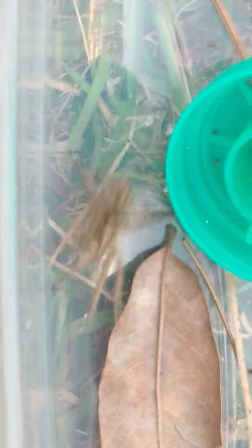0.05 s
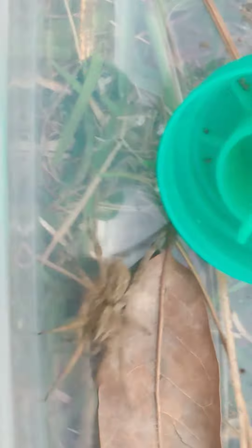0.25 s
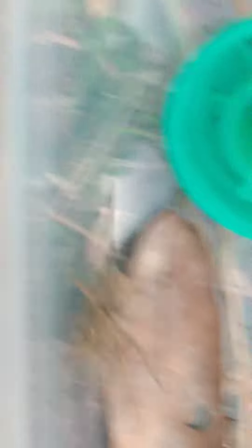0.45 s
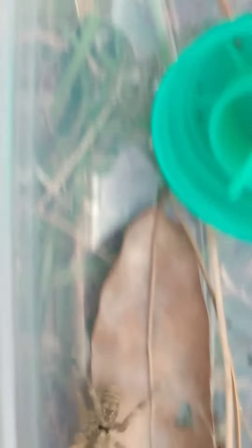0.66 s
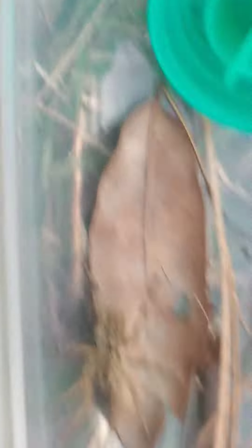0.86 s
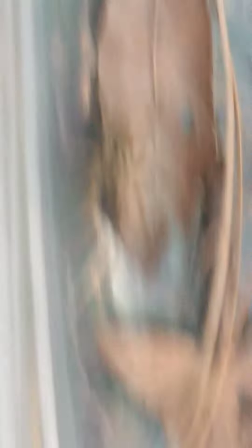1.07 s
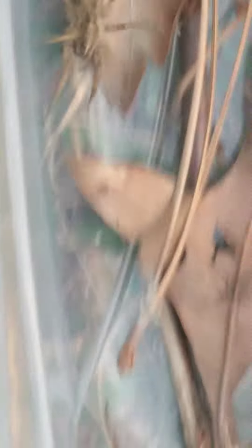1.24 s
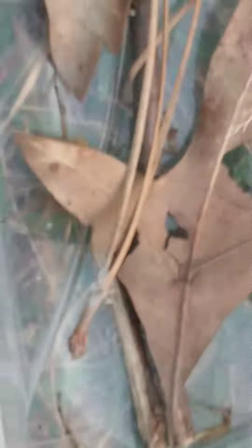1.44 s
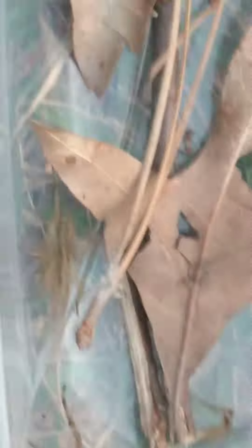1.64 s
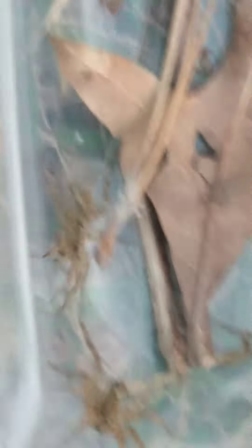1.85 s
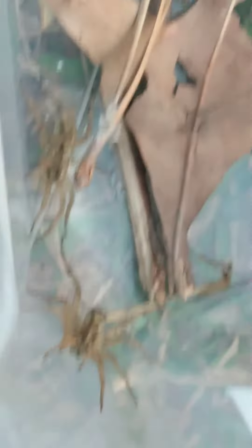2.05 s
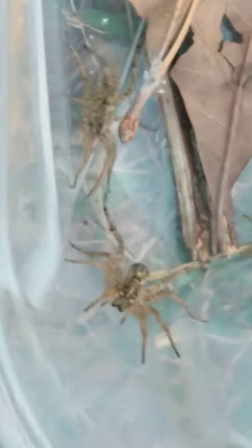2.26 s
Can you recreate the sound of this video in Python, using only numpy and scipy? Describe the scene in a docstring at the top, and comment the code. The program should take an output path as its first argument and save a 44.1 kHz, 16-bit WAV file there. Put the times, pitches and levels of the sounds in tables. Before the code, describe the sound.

Spiders scurry over dry leaves and pine needles in a plastic tub, making three faint, high rustles with tiny ticks, the last the loudest. Low rumble and soft bumps from the handheld phone run underneath.

```python
"""Spiders on dry leaves and pine needles in a plastic tub, followed by a hand-held phone.
From the start the hand rumbles and bumps on the case; needles ping over faint, wavering mid tones.
At 0.5 s the first scurry: tiny leg slips ring high leaf resonances, with a sharp tick.
Near 1 s a leg taps the tub; a second scurry adds a thin scrape, soft high flecks and more ticks.
The third, loudest scurry starts at 1.65 s and dies by 2.2 s; a few pings follow."""
import sys
import numpy as np
from scipy import signal
from scipy.fft import rfft, irfft
from scipy.io import wavfile
from scipy.ndimage import uniform_filter1d

SR = 44100
rng = np.random.default_rng(int(sys.argv[2]) if len(sys.argv) > 2 else 0)


def dump(signal):
    """Clip the signal to [-1, 1] and save it as 16-bit WAV at the path in sys.argv[1]."""
    limited = np.clip(np.atleast_2d(signal).T, -1, 1)
    pcm = np.round(limited * 32767).astype(np.int16)
    wavfile.write(sys.argv[1], SR, pcm)


N = 105840

# rustle, one table per scurry (time [s], level near 9, 11, 12.5 and 14 kHz [dB])
SCURRY_LEVELS = [
    [(0.514, -104, -109, -103, -101), (0.526, -81, -59.5, -70, -65), (0.624, -89, -73.5, -68, -68),
     (0.692, -71.5, -64.5, -63, -66), (0.744, -72, -65.5, -60.5, -69), (0.806, -89.5, -90, -75, -78),
     (0.828, -66.5, -68, -78, -73), (0.86, -65.5, -84.5, -86, -70), (0.918, -83, -96, -100, -104),
     (0.935, -70, -76, -93, -92)],
    [(0.99, -66, -79, -70, -92), (1.02, -58, -70, -69, -73), (1.082, -56.5, -56.5, -62, -59.5),
     (1.156, -66, -65.5, -71, -65), (1.186, -59.5, -64, -60, -63), (1.204, -71, -89, -73, -77),
     (1.3, -85, -86, -91, -87), (1.43, -83, -80, -71, -88), (1.444, -86, -57.5, -72, -71),
     (1.468, -78, -75, -71, -83), (1.62, -74, -73, -70, -81)],
    [(1.65, -64.5, -58, -57, -57), (1.678, -57.5, -57, -49, -54), (1.74, -67, -61.5, -62, -62.5),
     (1.884, -65, -86, -64.5, -79), (1.99, -82.5, -89, -68.5, -98), (2.094, -100, -90, -74, -100),
     (2.14, -79.5, -104, -81, -75), (2.2, -83, -105, -105, -110)],
]
# leaf resonances, one per level column (centre [Hz], width [Hz], gain [dB], drift [Hz/s])
LEAF_MODES = [(9130, 1400, -2, -7), (11430, 2400, -1.5, -700), (12420, 1100, -3.5, -350),
              (14400, 1500, -3.5, 4.5)]
# leaf resonances under hard scraping (centre [Hz], width [Hz], gain [dB])
HARD_MODES = [(7960, 1100, -0.5), (10500, 810, -21), (15800, 620, -23.5)]
# leg dragged along a leaf (time [s], pitch [Hz], level [dB])
SCRAPE_PATH = [(0.998, 11580, -77), (1.201, 11320, -75), (1.28, 11280, -68.5), (1.449, 11090, -64),
               (1.66, 11060, -66.5), (1.9, 10750, -76)]
# leg ticks, snapping fibres (time [s], peak [dB], centre [Hz], width [Hz], decay [s])
LEG_TICKS = [(0.5235, -61, 12200, 4500, 0.011), (1.176, -50.5, 9300, 1800, 0.0076),
             (1.4415, -55, 12850, 4020, .005), (1.8778, -44.5, 9050, 1590, 0.0018)]
# leg taps on the tub (time [s], level [dB], treble edge [Hz], decay [s])
WALL_TAPS = [(0.9747, -52, 14100, 0.00092), (1.6881, -58.5, 4800, 0.0056)]
# tub wall modes (centre [Hz], width [Hz], gain [dB])
WALL_MODES = [(2440, 330, -8.5), (3850, 790, -2), (4500, 700, -3.5), (6060, 1500, 1), (8400, 1500, 5.5),
              (12000, 1400, 3.5)]
# needle and leaf rings (time [s], level [dB], pitch [Hz], width [Hz], decay [s])
NEEDLE_PINGS = [(0.0, -85, 4270, 162, 0.052), (0.02, -87.5, 3140, 397, 0.099),
                (0.314, -80.5, 2950, 110, 0.016), (0.32, -81, 4250, 130, 0.055),
                (0.384, -74.5, 4190, 122, 0.077), (0.52, -80, 5930, 150, 0.028),
                (0.973, -74.5, 3850, 347, 0.043), (0.972, -82, 2500, 215, 0.042),
                (0.982, -70.5, 6000, 455, 0.093), (1.04, -76, 2056, 103, 0.03),
                (1.07, -66, 7180, 364, 0.042), (1.16, -69, 2122, 122, 0.057), (1.207, -77, 3140, 90, .031),
                (1.328, -75.5, 1664, 90, 0.035), (1.438, -76, 1950, 79, 0.025),
                (1.684, -76, 4420, 248, 0.033), (2.101, -72.5, 3835, 229, 0.038),
                (2.115, -81.5, 6060, 116, 0.031), (2.12, -74, 4450, 120, 0.022),
                (2.125, -71, 1530, 273, 0.028), (2.256, -76.5, 7970, 242, 0.085),
                (2.349, -71, 3950, 660, 0.12), (2.36, -76, 2925, 87, 0.1), (2.335, -70, 9900, 704, 0.12)]
# hand rumble envelope (time [s], level [dB])
RUMBLE_LEVELS = [(0, -67.5), (0.06, -54.5), (0.2, -53), (0.25, -41), (0.33, -52), (0.45, -42.5),
                 (0.56, -39.5), (0.65, -50.5), (0.8, -35), (0.92, -45), (1.0, -37.5), (1.11, -38.5),
                 (1.22, -44), (1.42, -46), (1.5, -39), (1.62, -36.5), (1.7, -45.5), (1.82, -44.5),
                 (1.89, -34.5), (2.0, -44), (2.15, -45.5), (2.3, -56), (2.4, -56)]
# hand rumble spectrum (frequency [Hz], relative density [dB])
RUMBLE_SPECTRUM = [(20, -12), (35, -9.5), (55, 3), (85, 2), (125, 1.5), (170, -11), (220, -26.5),
                   (320, -31.5), (450, -50), (800, -75.5)]
# finger bumps, higher if harder (time [s], peak [dB], pitch [Hz])
FINGER_BUMPS = [(0.2438, -26.5, 67.7), (0.433, -32.5, 87.5), (0.509, -30, 135), (0.5288, -22, 133.5),
                (0.685, -28.5, 87.2), (0.725, -30.5, 96.8), (0.7947, -22, 113.3), (0.803, -22, 99.5),
                (0.819, -21.5, 149.3), (0.886, -32, 105), (0.972, -34.5, 151.2), (1.111, -30, 156),
                (1.132, -30.5, 99), (1.176, -26.5, 125), (1.32, -25.5, 137), (1.5404, -30, 130),
                (1.606, -32.5, 160), (1.6294, -19.5, 132), (1.745, -31, 89), (1.868, -33.5, 96),
                (2.006, -23, 121), (2.119, -35, 98.6), (2.357, -44, 79)]
# skin rub spectrum (frequency [Hz], relative density [dB])
RUB_SPECTRUM = [(200, 2.5), (420, -11.5), (900, -51.5)]
# knocks on the case (time [s], level [dB])
CASE_KNOCKS = [(0.522, -38.5), (0.815, -46), (0.967, -46.5), (1.109, -54), (1.31, -48), (1.6282, -37.5),
               (2.003, -47.5)]
# phone case modes (frequency [Hz], decay [s], gain [dB])
PHONE_MODES = [(296, 0.018, -8), (341, 0.013, -7), (461.4, 0.013, -21)]
# wavering mid tones (middle [s], length [s], pitch [Hz], glide [Hz/s], level [dB])
TONE_SWELLS = [(0.045, 0.089, 1358, -200, -69), (0.179, .12, 810, 596, -78.5),
               (0.246, 0.072, 997, 0, -72.5), (0.365, 0.13, 947, 1101, -71),
               (0.448, 0.096, 1366, -700, -70.5), (0.594, 0.06, 1315, 699.5, -73),
               (0.774, 0.42, 1017, 1, -76), (1.01, 0.097, 1334, -500, -71.5),
               (1.101, 0.045, 1040, 7, -70.5), (1.118, 0.079, 1354, 8.5, -66.5),
               (1.23, 0.11, 1360, -1, -72.5), (1.388, 0.14, 737, 300.5, -71.5),
               (1.498, 0.13, 1301, -700, -73), (1.65, 0.13, 730, -500, -68),
               (1.681, 0.11, 1142, -400, -72.5), (1.78, 0.13, 1242, -0.5, -72), (2.007, 0.056, 720, 3, -71),
               (2.062, 0.14, 1124, 999, -68.5), (2.176, 0.24, 1265, -300, -69.5),
               (2.244, 0.089, 1147, -700, -70), (2.38, 0.094, 1180, 499.5, -74),
               (2.384, 0.041, 670, -3, -73)]
# background air spectrum (frequency [Hz], relative density [dB])
AIR_SPECTRUM = [(180, -33), (300, -4), (580, -2), (760, 2.5), (1050, -.5), (1350, 0.5), (1600, -8),
                (2800, -17.5), (12500, -18.5), (15500, -19.5)]
# air bands (edge [Hz])
AIR_EDGES_HZ = (0, 550, 800, 1000, 1200, 1500, 24000)

SLIPS_PER_S, SLIP_SCATTER_DB = 9000, 2
RIPPLE_DB, RIPPLE_STEP_HZ, RIPPLE_CHANGE_S = 5.0, 210, 0.11
DRIFT_ZERO_S = 1.6
HARD_DB, HARD_POWER = -50.5, 2.12  # level that counts as hard; growth exponent
RUSTLE_FLUTTER_DB, RUSTLE_FLUTTER_PER_S = 1.8, 50
FLECK_SPAN_S, FLECK_RANGE_HZ, FLECKS_PER_S = (1.0, 1.95), (6400, 15000), 130
FLECK_MIN_DB, FLECK_SCATTER_DB, FLECK_SIGMA_S = -84, 2.5, 0.013
RUB_DB = -18  # relative to the bump envelope
AIR_DB, AIR_FLUTTER_DB, AIR_FLUTTER_PER_S = -76, 2.6, 20


def rustle():
    """Slips ring leaf resonances that drift as the spiders move; hard scraping widens the sound."""
    t, rows = clock(), np.vstack(SCURRY_LEVELS)
    levels = [undb(np.interp(t, rows[:, 0], db, left=-110, right=-110)) for db in rows[:, 1:].T]
    out = np.zeros(N)
    for level, (hz, width, db, drift) in zip(levels, LEAF_MODES):
        ring = resonate(leg_slips(), hz, width, drift * (t - DRIFT_ZERO_S))
        out += level * undb(db) * steadied(ring, span_s=0.044)
    hard = sum(undb(db) * resonate(leg_slips(), hz, width) for hz, width, db in HARD_MODES)
    out += undb(HARD_DB) * (levels[0] / undb(HARD_DB)) ** HARD_POWER * hard
    return out * undb(RUSTLE_FLUTTER_DB * wander(RUSTLE_FLUTTER_PER_S))


def leg_slips():
    """Dense, uneven slips with a fine, shifting random ripple in their colour."""
    slips = (rng.random(N) < SLIPS_PER_S / SR) * rng.standard_normal(N)
    spectrum = rfft(slips * undb(SLIP_SCATTER_DB * rng.standard_normal(N)))
    knots, f = np.arange(0, SR / 2, RIPPLE_STEP_HZ), np.fft.rfftfreq(N, 1 / SR)
    ripples = [np.interp(f, knots, rng.standard_normal(len(knots))) for _ in range(4)]
    colours = np.stack([irfft(spectrum * undb(RIPPLE_DB * ripple), N) for ripple in ripples])
    progress = clock() / RIPPLE_CHANGE_S + rng.random()
    step, blend, i = progress.astype(int), progress % 1, np.arange(N)
    return (1 - blend) * colours[step % len(colours), i] + blend * colours[(step + 1) % len(colours), i]


def scrape():
    """A leg drags along a leaf: slips ring one narrow, slowly sinking resonance."""
    t = clock()
    when, hz, db = np.array(SCRAPE_PATH).T
    ring = resonate(leg_slips(), hz.mean(), width_hz=800, shift_hz=np.interp(t, when, hz) - hz.mean())
    return steadied(ring, span_s=0.04) * undb(np.interp(t, when, db, left=-120, right=-120))


def ticks():
    """Legs and snapping fibres crack for milliseconds, each in its own band."""
    return sum(undb(db) * crack(start, decay, hz, width) for start, db, hz, width, decay in LEG_TICKS)


def taps():
    """Light leg taps ring the tub wall; a softer tap barely stirs the high modes."""
    return sum(undb(db + gain) / (1 + (hz / edge) ** 6) * crack(when, decay, hz, width)
               for when, db, edge, decay in WALL_TAPS for hz, width, gain in WALL_MODES)


def pings():
    """Needles and leaves ring in faint, narrow bands that swell and fade."""
    t, out = clock(), np.zeros(N)
    for start, db, hz, width, decay in NEEDLE_PINGS:
        age, attack_s = t - start, 0.23 * decay
        envelope = np.clip(age / attack_s, 0, 1) * np.exp(-np.maximum(age - attack_s, 0) / decay)
        ring = steadied(resonate(rng.standard_normal(N), hz, width), span_s=0.043)
        out += undb(db) * ring * envelope
    return out


def hand_rumble():
    """The moving hand shakes the case: low noise in swells."""
    level_db = np.interp(clock(), *np.array(RUMBLE_LEVELS).T)
    return steadied(coloured(RUMBLE_SPECTRUM), span_s=0.097) * undb(level_db)


def finger_bumps():
    """Fingers push the case aside and it springs back; skin rubs during each bump."""
    t, bumps = clock(), np.zeros(N)
    for when, db, hz in FINGER_BUMPS:
        u = (np.pi * hz * (t - when)) ** 2
        bumps += undb(db) * (1 - 2 * u) * np.exp(-np.minimum(u, 60))  # case acceleration
    rub = uniform_filter1d(np.abs(bumps), size=SR // 200) * coloured(RUB_SPECTRUM)
    return bumps + undb(RUB_DB) * rub


def case_knocks():
    """Harder knocks ring the case modes; low-passed at 500 Hz."""
    t, ring = clock(), np.zeros(N)
    for when, db in CASE_KNOCKS:
        age = np.maximum(t - when, 0)
        for hz, decay, gain in PHONE_MODES:
            ring += undb(db + gain) * np.sin(2 * np.pi * hz * age) * np.exp(-age / decay)
    return signal.sosfiltfilt(signal.butter(4, 500, fs=SR, output="sos"), ring)


def flecks():
    """Brief, soft, high narrow-band flecks at random times and pitches."""
    age, out = clock()[:SR // 10], np.zeros(N)
    swell = np.exp(-0.5 * ((age - age.mean()) / FLECK_SIGMA_S) ** 2)
    for when, pitch, size in rng.random((int(FLECKS_PER_S * np.ptp(FLECK_SPAN_S)), 3)):
        start = int(np.interp(when, (0, 1), FLECK_SPAN_S) * SR)
        hz = np.interp(pitch, (0, 1), FLECK_RANGE_HZ)
        roughness = unit(np.convolve(rng.standard_normal(len(age)), np.hanning(SR // 200), "same"))
        db = FLECK_MIN_DB - FLECK_SCATTER_DB * np.log(1 - size)
        out[start:start + len(age)] += undb(db) * roughness * np.sin(2 * np.pi * hz * age) * swell
    return out


def wavering_tones():
    """Faint mid-pitched tones of narrow noise, in short, gliding, fluttering swells."""
    t, out = clock(), np.zeros(N)
    for middle, length, hz, glide, db in TONE_SWELLS:
        band = resonate(rng.standard_normal(N), hz, width_hz=110, shift_hz=glide * (t - middle))
        flutter_db = AIR_FLUTTER_DB / 2 * wander(AIR_FLUTTER_PER_S)
        swell = 1 / (1 + (2 * (t - middle) / length) ** 6)
        out += undb(db + flutter_db) * steadied(band, span_s=0.086) * swell
    return out


def air():
    """Faint broad noise whose middle bands flutter independently."""
    f = np.fft.rfftfreq(N, 1 / SR)
    spectrum = rfft(undb(AIR_DB) * coloured(AIR_SPECTRUM))
    low, *mids, high = [irfft(spectrum * (f >= lo) * (f < hi), N)
                        for lo, hi in zip(AIR_EDGES_HZ, AIR_EDGES_HZ[1:])]
    return low + high + sum(band * undb(AIR_FLUTTER_DB * wander(AIR_FLUTTER_PER_S)) for band in mids)


def crack(start_s, decay_s, hz, width_hz):
    """Dying burst of slips through one resonance; peak 1."""
    age = clock() - start_s
    burst = np.sign(rng.standard_normal(N)) * (age >= 0) * np.exp(-np.abs(age) / decay_s)
    ring = resonate(burst, hz, width_hz)
    return ring / np.abs(ring).max()


def resonate(x, hz, width_hz, shift_hz=0):
    """Steep-skirted resonance, moved by shift_hz; rms 1."""
    f = np.fft.fftfreq(N, 1 / SR)
    band = np.fft.ifft(np.fft.fft(x) * (f > 0) / (1 + np.abs((f - hz) / (0.51 * width_hz)) ** 4))
    cycles = np.cumsum(shift_hz + np.zeros(N)) / SR
    return unit(np.real(band * np.exp(2j * np.pi * cycles)))


def coloured(points):
    """Noise shaped by (frequency [Hz], level [dB]) points; rms 1."""
    hz, db = np.array(points, float).T
    f = np.fft.rfftfreq(N, 1 / SR)
    gain = undb(np.interp(np.log(f + 1), np.log(hz), db))
    return unit(irfft(rfft(rng.standard_normal(N)) * gain, N))


def steadied(x, span_s):
    """Even out the slow chance swells of a noise."""
    return x / np.sqrt(uniform_filter1d(x ** 2, max(int(span_s * SR), 3)) + 0.0067)


def wander(per_s):
    """Random curve, per_s knots a second; spread near 1."""
    knots = rng.standard_normal(1000)
    return np.sqrt(2) * np.interp(clock() * per_s, np.arange(len(knots)), knots)


def undb(db):
    """Decibels to gain."""
    return 10 ** (np.asarray(db) / 20)


def unit(x):
    """Scale to rms 1."""
    return x / np.sqrt(np.mean(x ** 2) + 1e-30)


def clock():
    """Sample times [s]."""
    return np.arange(N) / SR


def scene():
    """All layers at one microphone."""
    treble = rustle() + scrape() + flecks() + ticks() + taps() + pings()
    hand = hand_rumble() + finger_bumps() + case_knocks()
    return (treble + hand + air() + wavering_tones())[None, :]


def record(dry):
    """The phone cuts the treble above 15550 Hz."""
    return signal.sosfilt(signal.ellip(12, 0.1, 80, 15550, fs=SR, output="sos"), dry)


dry = scene()
out = record(dry)
dump(out)
```